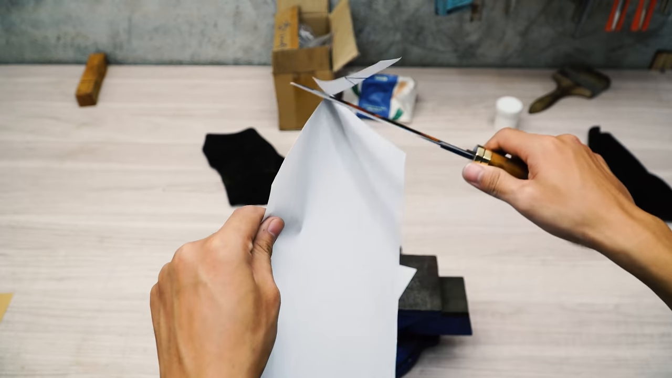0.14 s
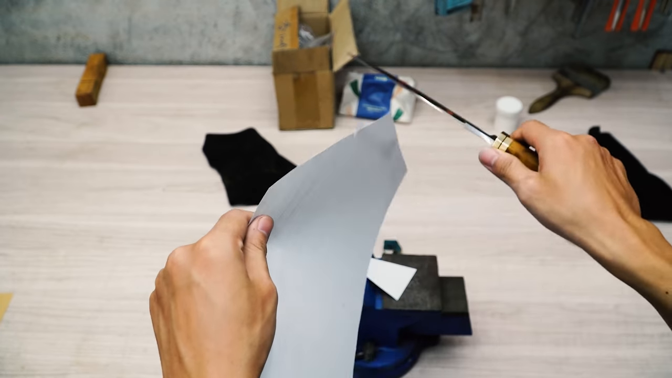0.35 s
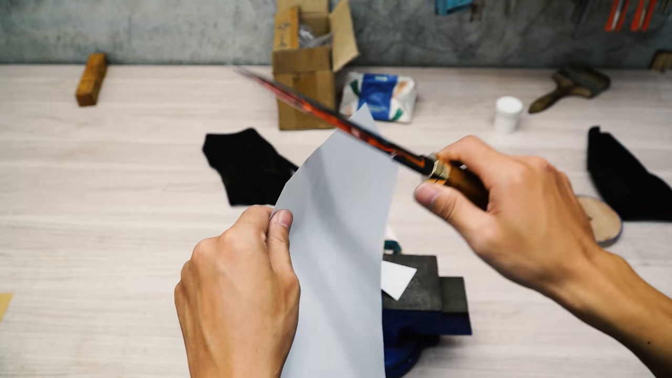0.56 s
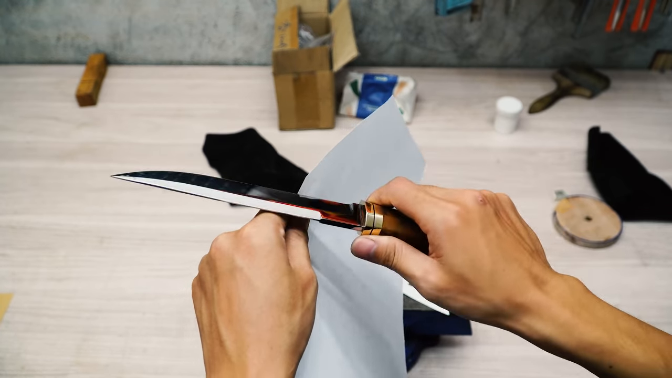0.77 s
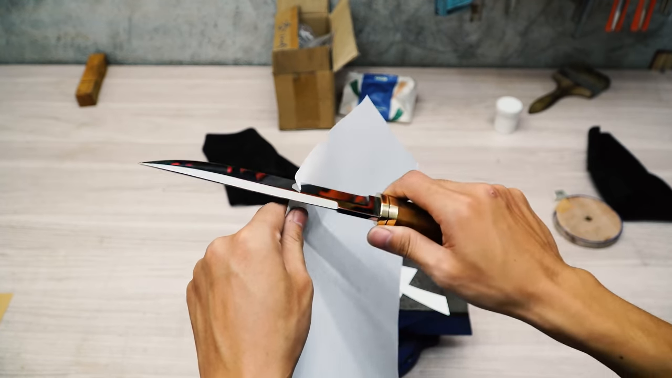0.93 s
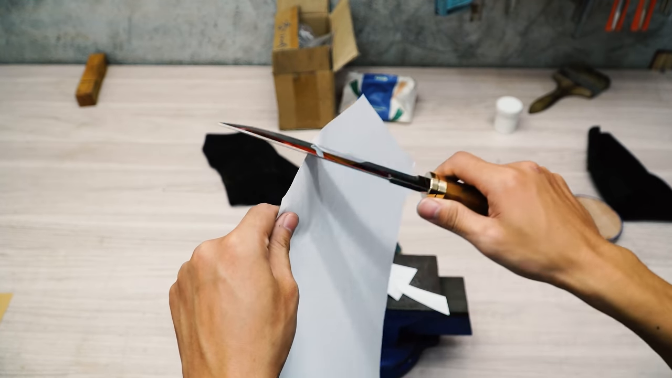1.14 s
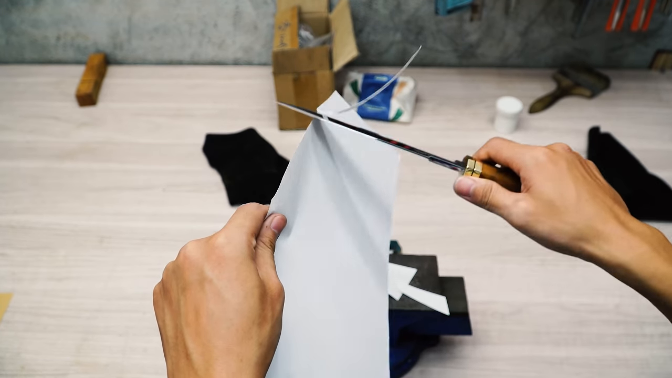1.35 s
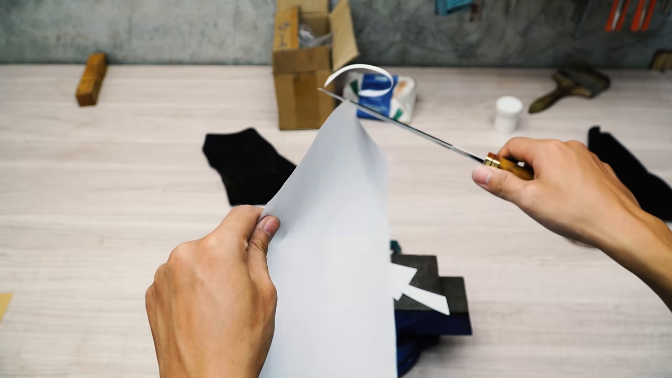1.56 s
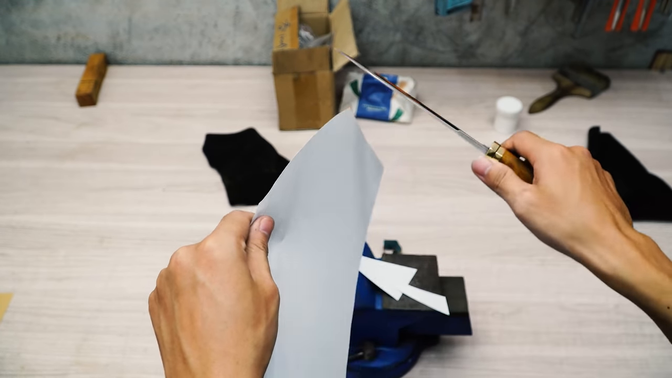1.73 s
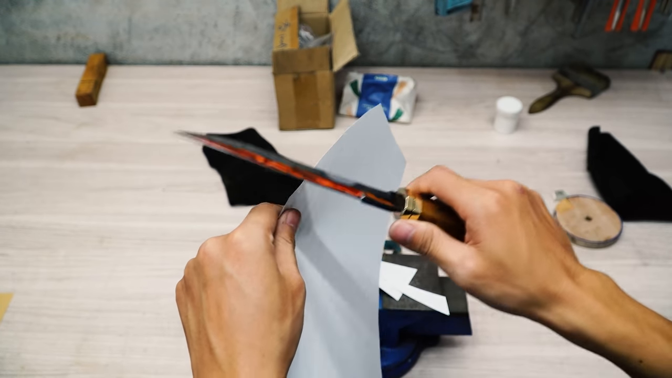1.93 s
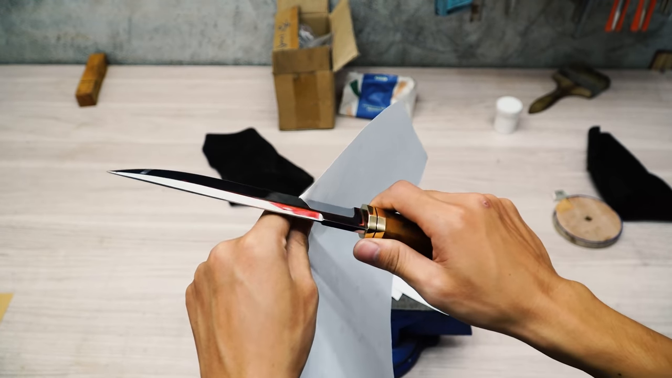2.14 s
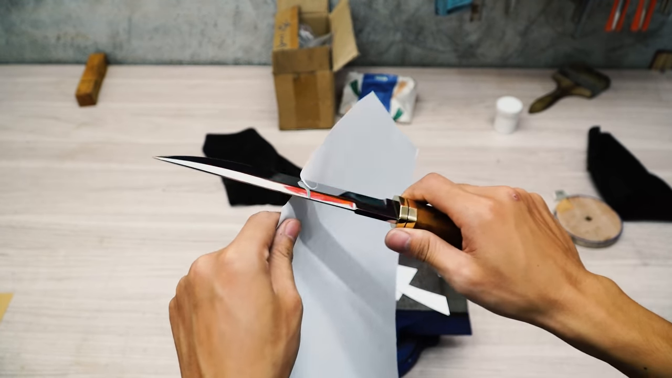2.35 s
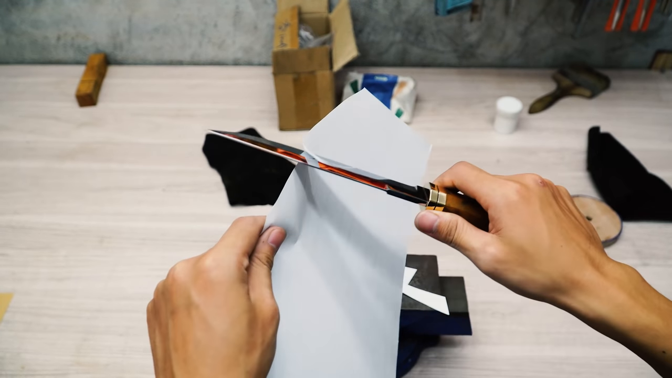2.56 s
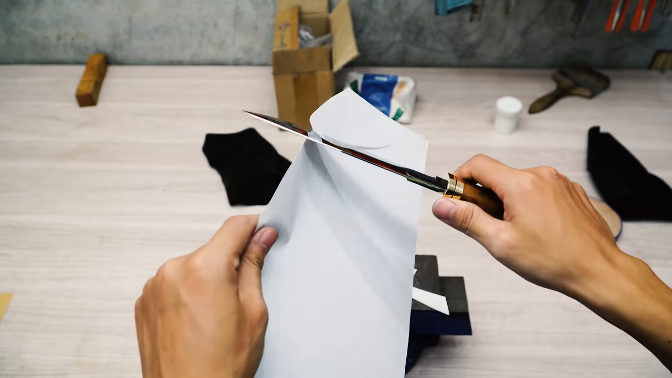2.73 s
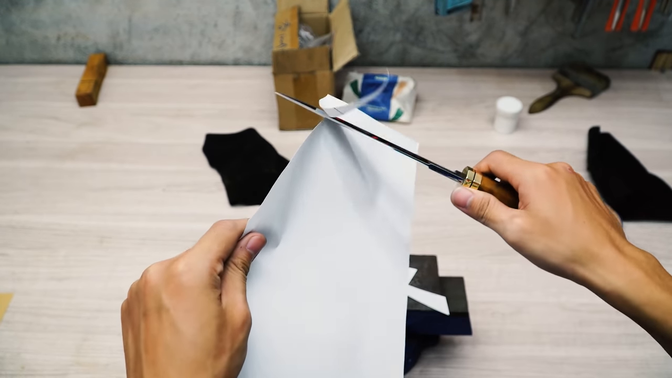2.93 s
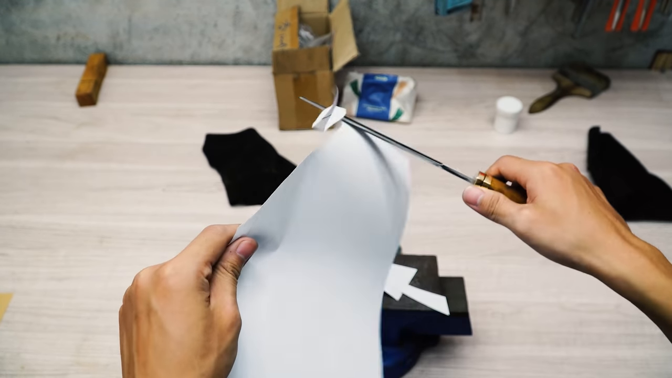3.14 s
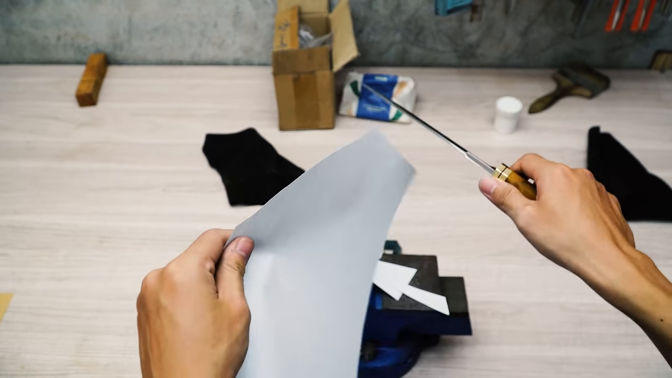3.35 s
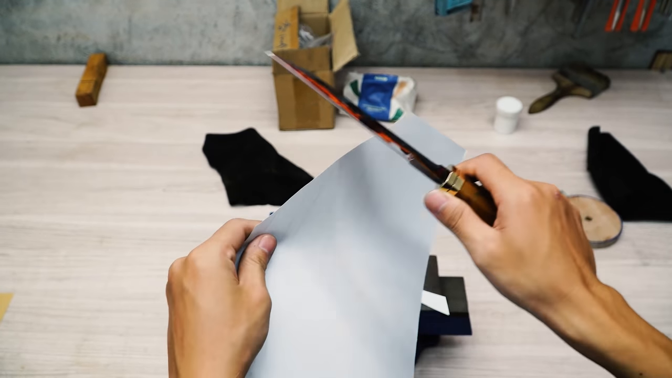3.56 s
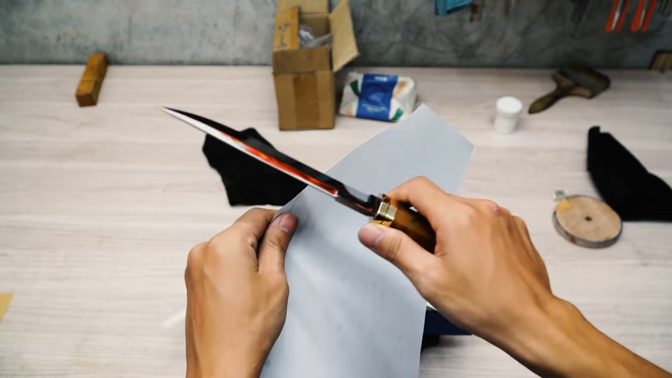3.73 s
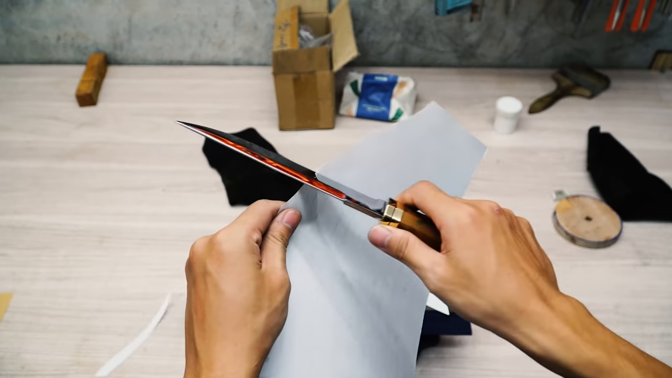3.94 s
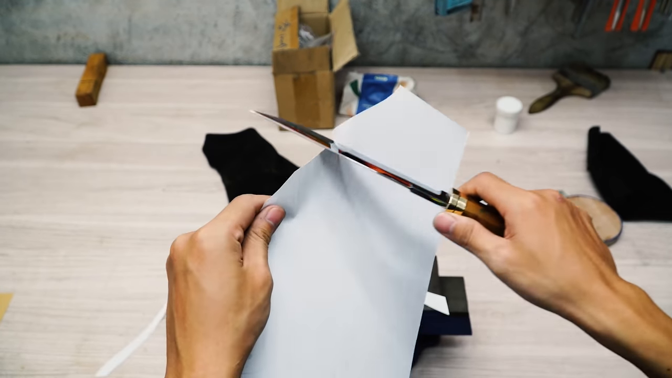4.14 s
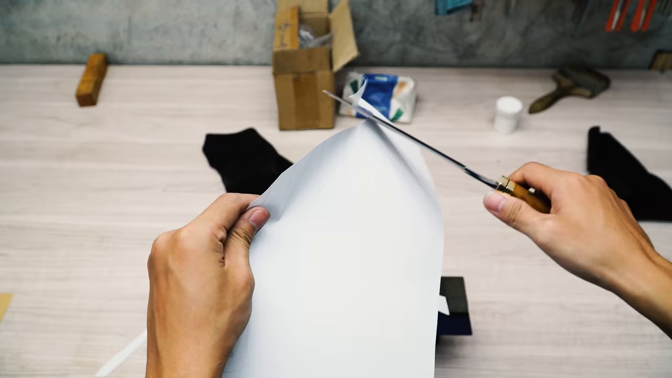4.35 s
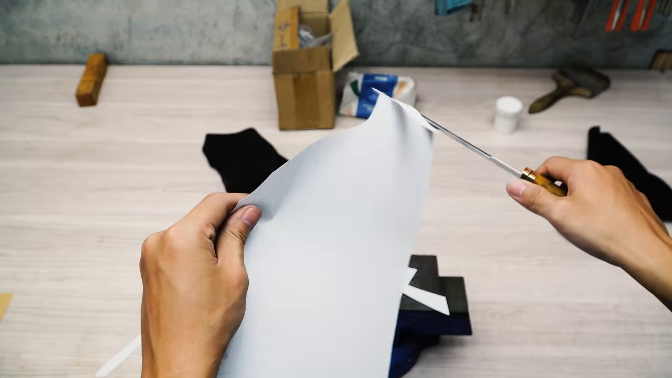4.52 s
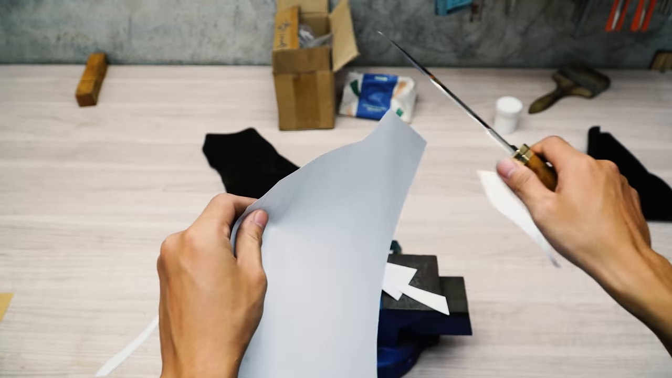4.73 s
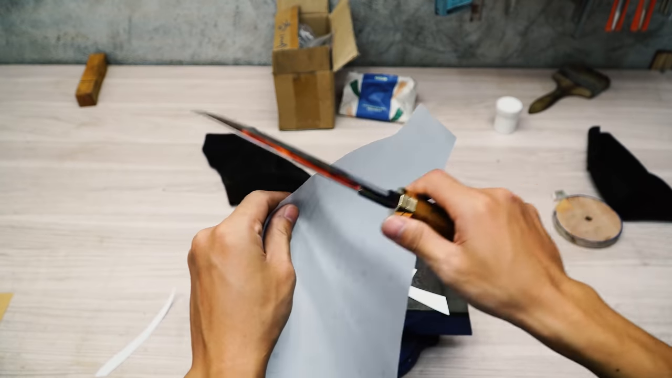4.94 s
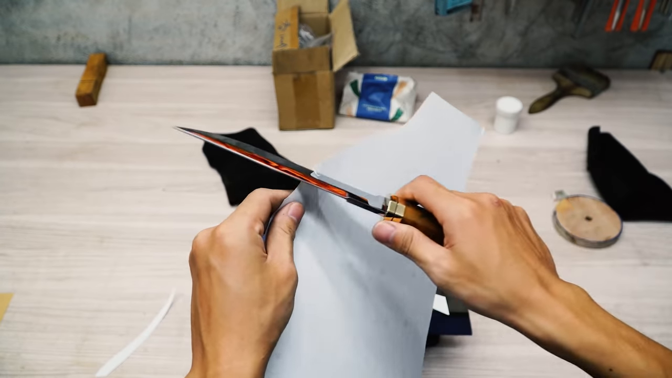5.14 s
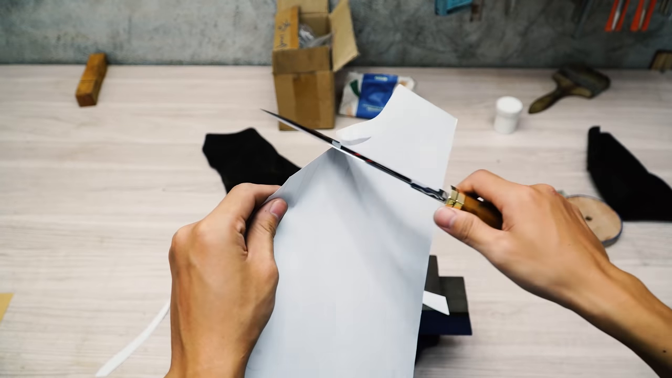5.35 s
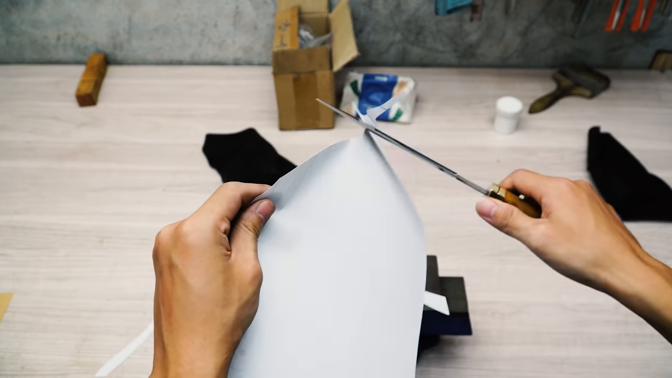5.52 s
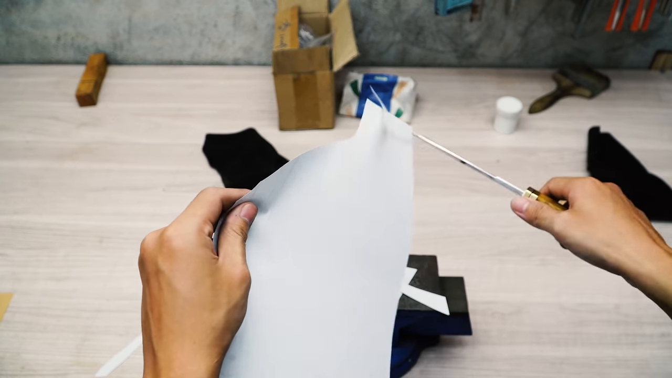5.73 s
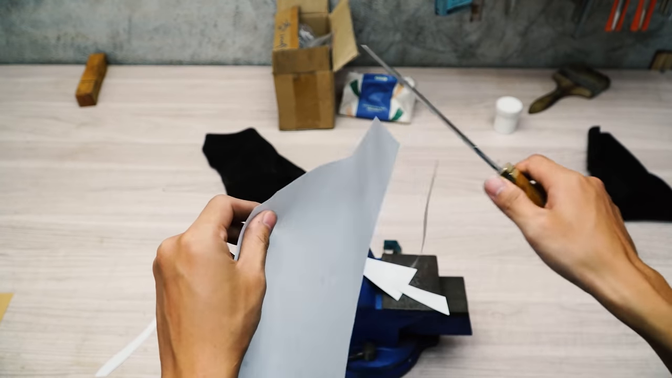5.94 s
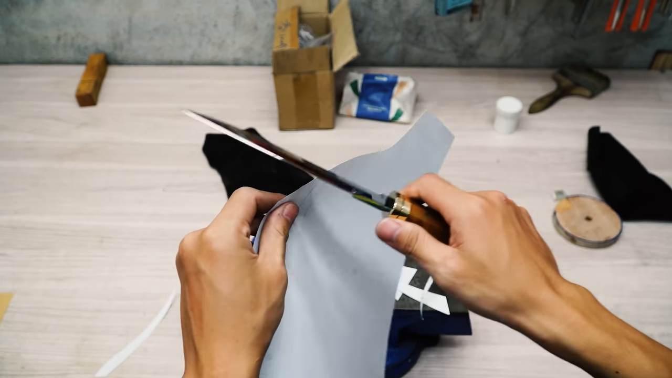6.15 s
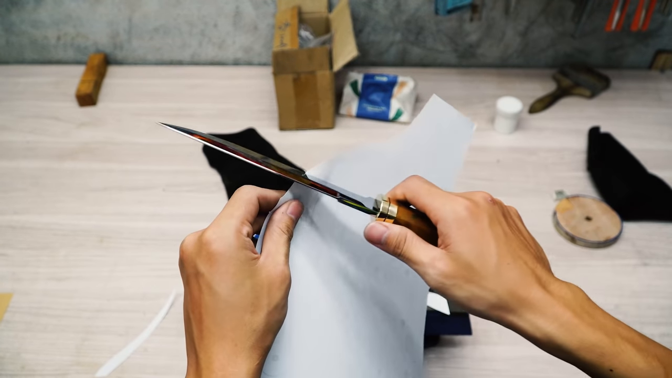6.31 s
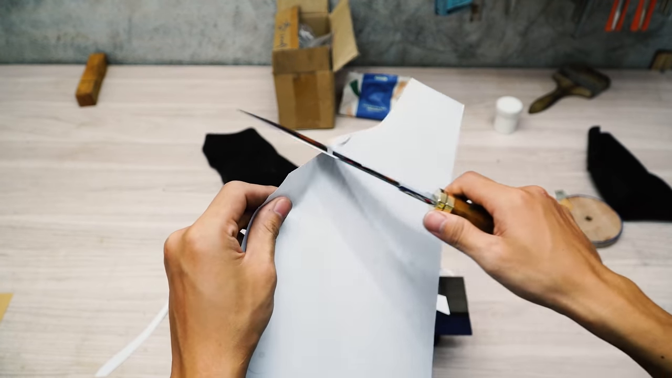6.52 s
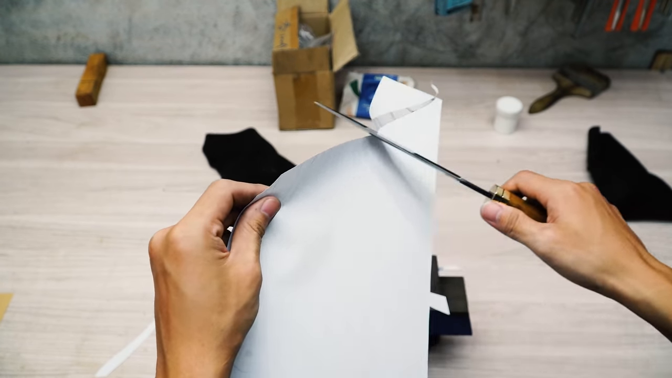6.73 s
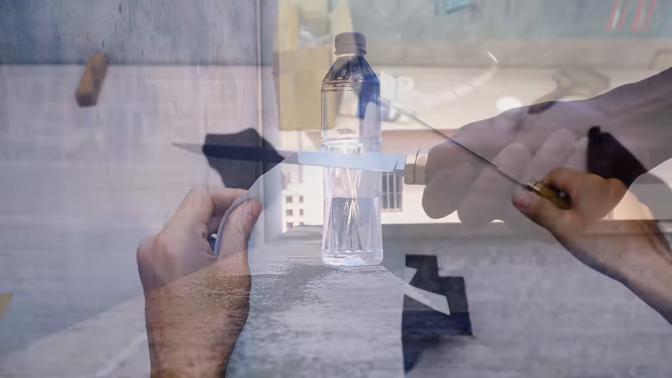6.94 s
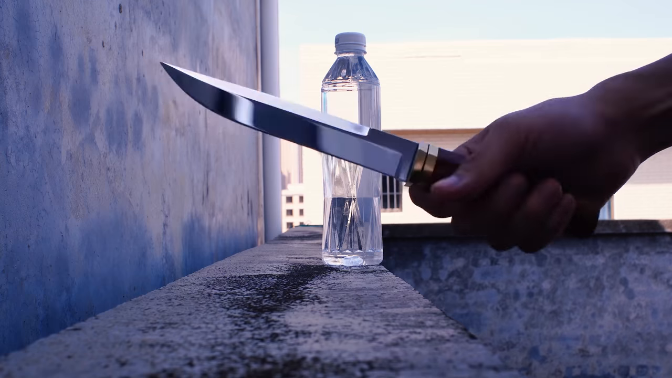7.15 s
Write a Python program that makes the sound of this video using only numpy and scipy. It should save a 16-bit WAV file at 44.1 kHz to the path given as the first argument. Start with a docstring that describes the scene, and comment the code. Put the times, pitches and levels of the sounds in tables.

```python
"""In a bare, echoing workshop, one microphone hears a knife already slicing through hand-held paper.
Five more cuts follow, each a dense hiss of breaking fibres, coloured by bands that glide as the cut runs.
Clicks with dying buzzes make the snaps as the blade bites or breaks free, and the flaps of the loose sheet.
Around the cuts come flutter, rustling and ticking scraps; two later ones fan air at the microphone.
Filtered noise makes the low hum and faint room noise throughout; at the end everything fades."""
import sys
import numpy as np
from scipy import signal
from scipy.fft import rfft, irfft, next_fast_len
from scipy.io import wavfile
from scipy.ndimage import uniform_filter1d, map_coordinates

SR = 44100
rng = np.random.default_rng(int(sys.argv[2]) if len(sys.argv) > 2 else 0)


def generate_wav(signal):
    """Clip the signal to [-1, 1] and save it as 16-bit WAV at the path in sys.argv[1]."""
    frames = np.transpose(np.atleast_2d(signal))
    scaled = np.clip(frames, -1, 1) * 32767
    pcm = np.round(scaled).astype(np.int16)
    wavfile.write(sys.argv[1], SR, pcm)


N = 321035
LEAD = SR // 2  # samples run before the start, so that the room is already ringing
TOP_HZ = 15750  # nothing is heard from here up
AIR_DB = -71  # room noise
CRACK_T60_S, FLAP_T60_S = 0.02, 0.044
FLUTTER_RISE_DB_PER_S, FLUTTER_DIES_DB_PER_S, FLUTTER_BEATS_DB = 894, 170, 2.5
RUSTLE_RISE_DB_PER_S, RUSTLE_DIES_DB_PER_S = 293, 150
SHEET_WANDERS_OCTAVES = 0.05

# One curve a stroke: (time [s], tearing level [dB], then over tearing: sheet flexing [dB],
# rasp [dB], edge hiss [dB])
STROKE_CURVES = [
    [(0.0, -45.5, -8, 0, -9), (0.028, -42, -7.5, -2, -9), (0.188, -47, -3, -2.5, 1),
     (0.214, -46, -18, -5, -2), (0.26, -54.5, 0.5, -7, 4.5)],
    [(0.9, -76, 7, 0, -9), (0.92, -63.5, 6.5, -3, -6), (0.956, -60.5, 4, 3, 1), (0.968, -50, 3.5, 0, -12),
     (0.992, -52, -9, 0, -6), (1.066, -52.5, -3.5, 4, -0.5), (1.224, -48, -9.5, -0.5, -5),
     (1.406, -49.5, -4.5, -1, -8), (1.584, -47.5, -18, -0.5, -3.5), (1.61, -44, -16, -14, -13.5),
     (1.62, -48.5, -5, -7, -8)],
    [(2.225, -77.5, -7, 2, -14), (2.265, -46, -2.5, -8, -14), (2.283, -51, -5, -0.5, -7.5),
     (2.345, -47, -12.5, -5, -9.5), (2.427, -52.5, -3.5, 0, -3), (2.553, -47, -3, 1.5, -4.5),
     (2.809, -47.5, -2, -1.5, -7), (2.993, -47.5, -7.5, -2, 0), (3.063, -44.5, 0.5, -1, -7.5),
     (3.079, -48.5, 5.5, 0.5, -1.5), (3.22, -48, 2.5, -1.5, -4)],
    [(3.98, -72, -4, -7, -3), (4.008, -57, 5, 3, -7), (4.054, -49.5, 4, -2, -5),
     (4.114, -46.5, -5, -1.5, -4.5), (4.176, -48.5, 0.5, -1, -4), (4.306, -47, -0.5, 1.5, -4.5),
     (4.404, -48.5, 0.5, 5, -0.5), (4.426, -41, 0.5, -1, -7), (4.444, -40, -6, -1, -6),
     (4.474, -36, -9.5, -6.5, -7), (4.53, -44.5, -4.5, -2, -3.5)],
    [(5.15, -78, 8, -3, -4), (5.184, -52, -4.5, -5, -6), (5.282, -49.5, -2.5, -0.5, -4),
     (5.316, -47.5, -5.5, -3.5, -6), (5.552, -50, -3, 4.5, 3), (5.572, -39, -1.5, -3.5, -6),
     (5.586, -40.5, -5, -12, -7), (5.614, -41, -2, -1, -2), (5.696, -42, -9, -8.5, -5.5),
     (5.724, -45, 2.5, -1, -8.5), (5.77, -46, -33, -5, -9)],
    [(6.36, -61.5, 2, -12, -22), (6.404, -51, 4, -4, -4.5), (6.484, -49, -6.5, -1.5, -5),
     (6.558, -49.5, 2, -1.5, -4.5), (6.626, -45, -11, -3, -3.5), (6.642, -46, -3.5, 0, -3.5),
     (6.822, -47.5, -8, -3.5, 0.5), (6.888, -47.5, -0.5, 5.5, 3.5), (6.934, -41.5, -8, -0.5, -5),
     (7.016, -51, -2.5, 0.5, -2), (7.07, -54, 4.5, -7, -20)],
]
# The strip being cut grows and the held sheet changes shape, so bands glide through each stroke:
# (strip, sheet's upper band, sheet's lower band, edge hiss), each (on entry [Hz], on leaving [Hz])
STROKE_GLIDES = [((4500, 3900), (1450, 1800), (620, 700), (11000, 9400)), ((5200, 3200), (1600, 2470),
                 (850, 560), (8570, 9400)), ((5100, 2620), (1600, 2400), (950, 550), (8100, 9200)),
                 ((5340, 2600), (1650, 2170), (640, 560), (9500, 9900)), ((5400, 2500), (1850, 1540),
                 (690, 790), (9722.2, 8900)), ((5700, 3570), (2000, 1480), (720, 750), (9360, 8600))]
# Colour of each layer of the cut: (frequency [Hz], relative density [dB per Hz])
TEAR_SPECTRUM = [(740, -30.5), (1250, -4), (1660, -0.5), (2010, -3), (2300, -0.5), (3200, -0.5),
                 (4160, -17.5), (7040, -120)]
FLEX_SPECTRUM = [(88, -47), (150, -19), (211, -13), (380, -3.5), (424, -6), (531, -2), (1300, -2),
                 (1690, -8), (2860, -120)]
RASP_SPECTRUM = [(1880, -30), (3200, -5.5), (4390, -2), (5110, -6), (5800, -6), (7540, -21.5),
                 (12800, -120)]
HISS_SPECTRUM = [(3240, -32.5), (5500, -3.5), (7000, -3.5), (9670, -5.5), (11800, -6), (15700, -19)]
# The blade bites or breaks free, a crack with a flap of the sheet:
# (time [s], crack level [dB], crack pitch [Hz], flap lag [s], flap level [dB], flap pitch [Hz])
BLADE_SNAPS = [(.963, -28, 3900, -0.00057, -27, 976), (2.243, -43, 2800, 0.0079, -62, 900),
               (2.259, -24.5, 3740, 0.0041, -30.5, 1120), (3.233, -14, 3800, .005, -30, 760),
               (3.2345, -21, 2500, .011, -31, 1000), (3.474, -35.5, 2440, -0.003, -32, 770),
               (5.178, -42, 1800, -0.0063, -60, 700), (5.567, -28, 3000, .001, -27, 644),
               (6.346, -36, 2660, 0.0016, -33, 720), (6.633, -34.5, 1610, -0.002, -35.5, 800)]
# The loose sheet flaps: (time [s], level [dB], pitch [Hz])
SHEET_FLAPS = [(1.644, -36, 720), (1.738, -53, 775), (1.921, -49.5, 720), (3.455, -37, 800),
               (3.549, -50, 800), (4.005, -56, 778), (4.439, -27.5, 525), (4.624, -36.5, 704),
               (4.88, -48.5, 686), (5.128, -42.5, 680), (5.898, -45, 1000), (5.932, -44, 1000)]
# The freed sheet flutters: (start [s], hold [s], level [dB])
SHEET_FLUTTER = [(.3, 0.098, -56.5), (1.66, 0.074, -65), (3.27, .22, -59), (4.56, 0.11, -52),
                 (5.8, .13, -62)]
# The freed sheet fans air at the microphone: (time [s], level [dB])
AIR_PUFFS = [(4.53, -55.5), (5.73, -47)]
# Scraps touch the steel block and the bench: (time [s], level [dB], pitch [Hz], t60 [s])
SCRAP_TICKS = [(.585, -66, 10000, .04), (.625, -65, 9900, .04), (.766, -59, 9600, 0.033),
               (.795, -66, 10000, .05), (1.961, -44.5, 9900, 0.034), (1.992, -60, 8900, .04),
               (3.43, -40.5, 5300, 0.017), (3.492, -62, 9200, .13), (3.6, -61, 9000, .06),
               (3.64, -57, 4480, .046), (3.81, -66, 4600, .046), (3.879, -64, 4540, 0.033),
               (5.049, -67.5, 11400, .13), (5.12, -56, 6000, 0.032), (6.061, -61, 6000, .03),
               (6.135, -70, 11500, .056)]
# Loose paper rustles between strokes: (start [s], hold [s], level [dB])
PAPER_RUSTLE = [(.63, 0.22, -73.5), (1.96, 0.026, -78.5), (3.42, 0.18, -73), (3.78, 0.04, -74.5)]
# Colour of the rustling: (frequency [Hz], relative density [dB per Hz])
SCRAP_SPECTRUM = [(590, -43), (1000, -1.5), (1320, -8.5), (1430, 1.5), (1540, 1), (9600, -10), (12500, -29),
                  (16200, -55), (22000, -120)]
# Bench and near walls: (delay [s], level [dB])
NEAR_REFLECTIONS = [(.0055, -13), (0.009, -34), (.016, -10.5)]
# Decay of the workshop's tail: (frequency [Hz], t60 [s])
ROOM_DECAY = [(250, 0.58), (800, 0.52), (1800, 0.73), (3500, 0.58), (6000, 0.62), (12000, 0.32)]
# Course of the hum: (time [s], level [dB])
HUM_LEVEL = [(0.0, -68.5), (1.56, -62.5), (2.13, -65), (2.55, -62), (3.31, -64.5), (3.76, -61), (4.25, -70),
             (4.6, -65), (5.85, -64.5), (6.08, -71.5), (6.82, -70), (7.0, -64.5)]
# Bands of the hum: (frequency [Hz], width [Hz], level [dB])
HUM_BANDS = [(49, 10.5, -1.5), (74.2, 3.4, -4), (113.6, 7.3, -8), (143.5, 15, -13.5)]
# Colours of the low rumble and the room noise: (frequency [Hz], relative density [dB per Hz])
RUMBLE_SPECTRUM = [(12, -45.5), (20, -11.5), (38, -8), (59, 5), (103, -1), (146, -11.5), (194, -12.5),
                   (211, -28.5), (250, -27), (320, -57), (550, -120)]
AIR_SPECTRUM = [(120, -16), (200, 0), (855, -8), (1740, -17), (5080, -26.5), (9310, -32.5), (11700, -31),
                (12500, -48), (16200, -81), (22000, -120)]
# The closing fade: (time [s], level [dB])
CLOSING_FADE = [(6.9, -1), (7.05, -3), (7.15, -7.5), (7.22, -15.5), (7.28, -38)]


def slicing():
    """The blade tears fibres, rasps and hisses along the cut edge and sets the whole sheet flexing."""
    tear_db, flex_db, rasp_db, hiss_db = joined(STROKE_CURVES)
    strip_hz, upper_hz, lower_hz, edge_hz = gliding_bands()
    tear = coloured(fibres(14000, spread_db=1.5, clump_db=2.06, patchy_db=0.6), TEAR_SPECTRUM)
    tear = favour(tear, upper_hz, octaves=0.36, lift_db=5.0)
    tear = favour(tear, strip_hz, octaves=0.12, lift_db=3.5)
    flex = coloured(fibres(9000, spread_db=0.7, clump_db=2.05, patchy_db=2.5), FLEX_SPECTRUM)
    flex = favour(flex, lower_hz, octaves=0.3, lift_db=4.5)
    rasp = coloured(fibres(14000, spread_db=1.5, clump_db=2.07, patchy_db=1.0), RASP_SPECTRUM)
    rasp = favour(rasp, strip_hz, octaves=0.13, lift_db=4)
    hiss = coloured(fibres(16000, spread_db=0.63, clump_db=1.3, patchy_db=2.0), HISS_SPECTRUM)
    hiss = favour(hiss, edge_hz, octaves=0.18, lift_db=4.5)
    return amp(tear_db) * (tear + amp(flex_db) * flex + amp(rasp_db) * rasp + amp(hiss_db) * hiss)


def gliding_bands():
    """Band centres [Hz] that glide from entry to leaving as the cut proceeds, wandering slightly."""
    enter = np.array([stroke[0][0] for stroke in STROKE_CURVES])
    leave = np.array([stroke[-1][0] for stroke in STROKE_CURVES])
    which = np.maximum(np.searchsorted(enter, clock()) - 1, 0)
    done = np.clip((clock() - enter[which]) / (leave - enter)[which], 0, 1)
    ends_hz = np.array(STROKE_GLIDES)[which].transpose(1, 2, 0)
    return [first * (last / first) ** done * 2 ** (SHEET_WANDERS_OCTAVES * wobble(9))
            for first, last in ends_hz]


def fibres(rate, spread_db, clump_db, patchy_db):
    """Fibres breaking at random (rate a second), in clumps; the bending sheet shifts colour in patches."""
    n = N + LEAD
    strengths = rng.standard_normal(n) * amp(spread_db * rng.exponential(size=n))
    breaks = (rng.random(n) < rate / SR) * strengths * amp(clump_db * wobble(60))
    hz, t, z = signal.stft(breaks, SR, nperseg=512)
    # smoothed over frequency, then over time
    patches = uniform_filter1d(uniform_filter1d(rng.standard_normal(z.shape), 7, 0), 16, 1)
    return signal.istft(z * amp(patchy_db * unit(patches)), SR, nperseg=512)[1][:n]


def favour(x, centre_hz, octaves, lift_db):
    """A piece of paper favours one band, which moves as the cut changes its size."""
    hz, t, z = signal.stft(x, SR, nperseg=512)
    centre = centre_hz[np.minimum((t * SR).astype(int), len(x) - 1)]
    near = np.exp(-.5 * (np.log2((hz[:, None] + 1) / centre) / octaves) ** 2)
    return unit(signal.istft(z * amp(lift_db * near), SR, nperseg=512)[1][:len(x)])


def snaps():
    """The blade's cracks and the sheet's flaps are broad and sudden."""
    cracks = [(s, db, hz, CRACK_T60_S) for s, db, hz, *_ in BLADE_SNAPS]
    flaps = [(s + lag, db, hz, FLAP_T60_S) for s, _, _, lag, db, hz in BLADE_SNAPS]
    flaps += [(*row, FLAP_T60_S) for row in SHEET_FLAPS]
    return (bursts(cracks, cycles=0.82, width=0.87, rise=0.002, buzz_db=-12)
            + bursts(flaps, cycles=0.7, width=0.63, rise=0.0022, buzz_db=-4))


def ticks():
    """Scraps touching down tick brightly, with a softer start and a narrower band than the snaps."""
    return bursts(SCRAP_TICKS, cycles=1.5, width=0.29, rise=0.0036, buzz_db=-3.0)


def bursts(table, cycles, width, rise, buzz_db):
    """A click of a few cycles at the event's pitch, then a dying buzz in the band around it."""
    out = np.zeros(N + LEAD + SR)
    t = np.arange(SR // 6) / SR
    late = t - .001  # the click centres 1 ms in
    grit = rng.standard_normal((len(table), len(t)))
    for (s, db, hz, t60), noise in zip(table, grit):
        click = np.cos(2 * np.pi * hz * late) * np.exp(-(late * hz / cycles) ** 2)
        click *= np.minimum(t / 0.0014, 1)
        # band-pass resonance, applied twice
        band = lambda f: (1j * f * hz * width / (hz * hz - f * f + 1j * f * hz * width)) ** 2
        decay = amp(buzz_db - 60 * t / max(t60, .003))
        buzz = unit(filtered(noise, band)) * decay * (1 - np.exp(-t / rise))
        out[LEAD + round(s * SR):][:len(t)] += amp(db) * (click + buzz)
    return out[:N + LEAD]


def flutter():
    """Once cut free, the sheet keeps flapping softly, in uneven beats."""
    gain = swells(SHEET_FLUTTER, FLUTTER_RISE_DB_PER_S, FLUTTER_DIES_DB_PER_S)
    beats = amp(FLUTTER_BEATS_DB * wobble(30))
    sheet = coloured(fibres(5000, spread_db=2.5, clump_db=3.0, patchy_db=0.5), FLEX_SPECTRUM)
    return gain * beats * sheet


def puffs():
    """Air pushed at the microphone: one slow 28 Hz surge each, under a short bell-shaped swell."""
    t = clock()
    return sum(amp(db) * np.sin(2 * np.pi * 28 * (t - s)) * np.exp(-((t - s - .015) / 0.021) ** 2)
               for s, db in AIR_PUFFS)


def rustle():
    """Soft whisper of cut strips sliding and settling."""
    gain = swells(PAPER_RUSTLE, RUSTLE_RISE_DB_PER_S, RUSTLE_DIES_DB_PER_S)
    return gain * coloured(fibres(5400, spread_db=1.0, clump_db=-0.5, patchy_db=2.0), SCRAP_SPECTRUM)


def swells(table, rise_db_per_s, dies_db_per_s):
    """Gain of events that rise, hold and die away."""
    t = clock()
    gain = np.zeros(len(t))
    for s, hold, db in table:
        before, after = np.maximum(s - t, 0), np.maximum(t - s - hold, 0)
        gain += amp(db - rise_db_per_s * before - dies_db_per_s * after)
    return gain


def room(x, wet_db):
    """The cut travels along the sheet, so each eighth of a second meets a new reply."""
    hop = SR // 8
    out, padded = np.zeros(len(x) + 2 * SR + hop), np.pad(x, hop)
    for start in range(0, len(x) + hop, hop):
        piece = padded[start:start + 2 * hop]
        windowed = piece * np.hanning(2 * hop)[:len(piece)]  # neighbours overlap by half
        heard = signal.fftconvolve(windowed, answer())
        out[start:start + len(heard)] += heard
    return x + amp(wet_db) * out[hop:hop + len(x)]


def answer():
    """The room's reply to one click: near reflections and a tail whose frequencies die at their own speeds."""
    hz, t, z = signal.stft(rng.standard_normal(SR), SR, nperseg=256)
    decay = amp(-60 * t / along(ROOM_DECAY, hz)[:, None])
    tail = signal.istft(z * decay, SR, nperseg=256)[1]
    reply = amp(-3.0) * np.pad(tail / np.linalg.norm(tail), (SR // 100, 0))  # tail starts 10 ms late
    for delay, db in NEAR_REFLECTIONS:
        reply[round(delay * SR * rng.uniform(.93, 1.07))] += amp(db)
    return reply


def background():
    """A wavering low hum from machinery somewhere, over rumble and smooth room noise."""
    n = N + LEAD
    hum_db = np.interp(clock(), *np.transpose(HUM_LEVEL)) + 1.9 * wobble(5)
    bands = lambda f: sum(amp(db) / (1 + ((f - hz) / (width / 2)) ** 2) for hz, width, db in HUM_BANDS)
    drone = unit(filtered(rng.standard_normal(n), bands))
    rumble = coloured(rng.standard_normal(n), RUMBLE_SPECTRUM)
    air = coloured(rng.standard_normal(n), AIR_SPECTRUM)
    return amp(hum_db) * (drone + amp(-4) * rumble) + amp(AIR_DB) * air


def amp(db):
    """Decibels to amplitude."""
    return 10 ** (np.asarray(db) / 20)


def unit(x):
    """x scaled to an RMS of one."""
    return x / np.sqrt(np.mean(x ** 2) + 1e-20)


def clock():
    """Time [s] of every sample, from half a second early."""
    return np.arange(-LEAD, N) / SR


def along(points, hz):
    """(frequency [Hz], value) points read on a log frequency axis."""
    f, v = np.transpose(points)
    return np.interp(np.log(hz + 1), np.log(f + 1), v)


def joined(tables):
    """Columns of several tables per sample; the first, a level, is silent between tables far apart."""
    rows = list(tables[0])
    ending = [(99, *tables[-1][-1][1:])]  # far beyond the end, so the last stroke also falls silent
    for table in [*tables[1:], ending]:
        last, first = rows[-1], table[0]
        if first[0] - last[0] > .05:
            rows += [(last[0] + 0.021, -110, *last[2:]), (first[0] - .012, -110, *first[2:])]
        rows += table
    s, *cols = np.transpose(rows)
    return [np.interp(clock(), s, c) for c in cols]


def filtered(x, response):
    """x shaped by a response of frequency."""
    m = next_fast_len(x.shape[-1] + 8192)
    return irfft(rfft(x, m) * response(np.fft.rfftfreq(m, 1 / SR)), m)[..., :x.shape[-1]]


def coloured(x, spectrum):
    """x filtered by a spectrum table, at an RMS of one."""
    return unit(filtered(x, lambda hz: amp(along(spectrum, hz))))


def wobble(rate):
    """A smooth random curve, rate knots a second."""
    n = N + LEAD
    knots = rng.standard_normal(int(n * rate / SR) + 4)
    return map_coordinates(knots, [np.arange(n) * rate / SR])


def scene():
    """Paper sounds ring in the workshop; puffs and background reach the one microphone without its reply."""
    cutting = room(slicing() + rustle(), wet_db=-0.03)
    # the sheet throws these towards the microphone, so less room is heard
    flapping = room(snaps() + ticks() + flutter(), wet_db=-3)
    mix = cutting + flapping + puffs() + background()
    return np.tile(mix[LEAD:], (2, 1))  # the same in both channels


def record(dry):
    """A closing fade, and nothing above the band limit."""
    fade_db = np.interp(np.arange(N) / SR, *np.transpose(CLOSING_FADE))
    return filtered(dry * amp(fade_db), lambda hz: hz < TOP_HZ)


dry = scene()
out = record(dry)
generate_wav(out)
```